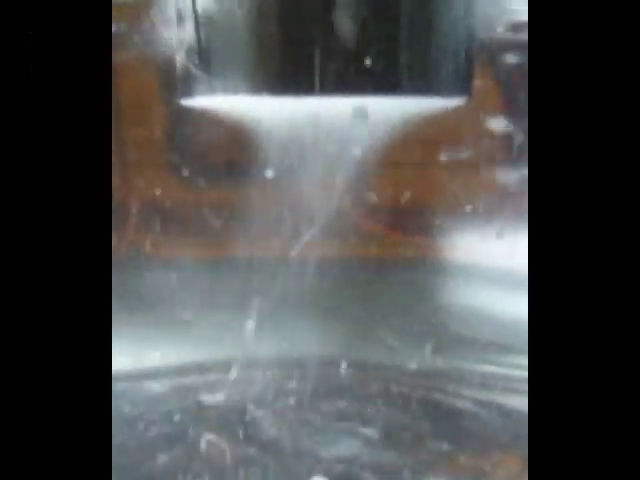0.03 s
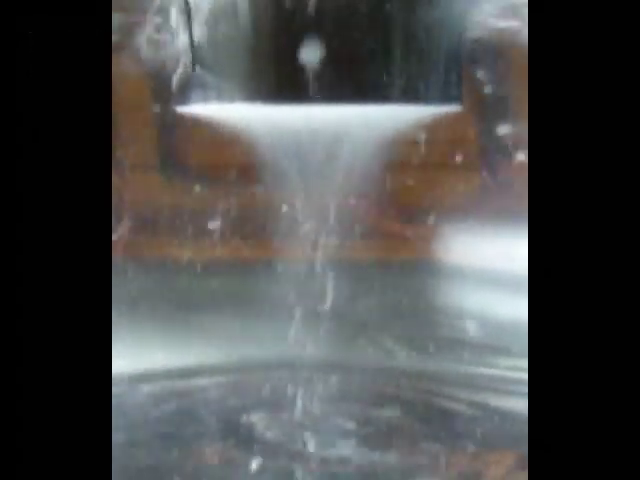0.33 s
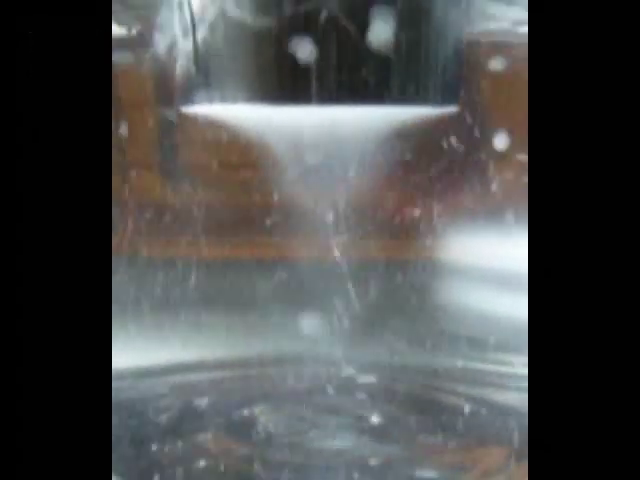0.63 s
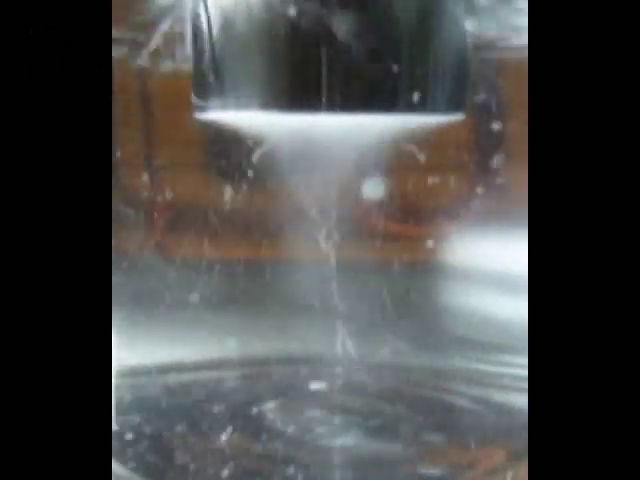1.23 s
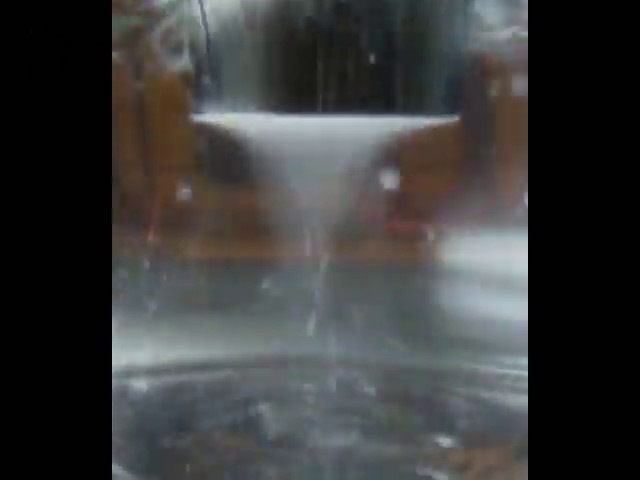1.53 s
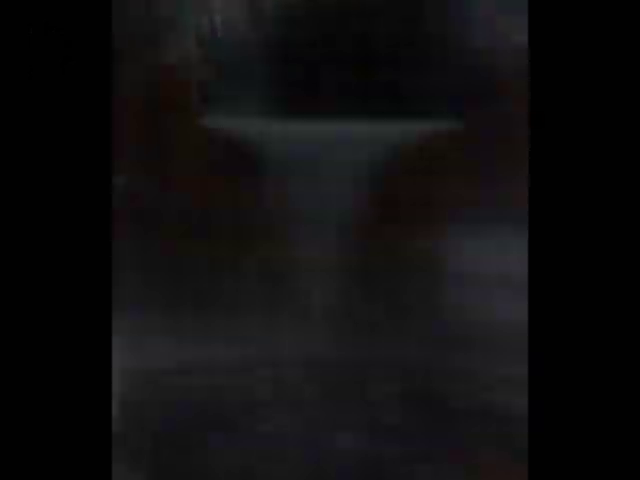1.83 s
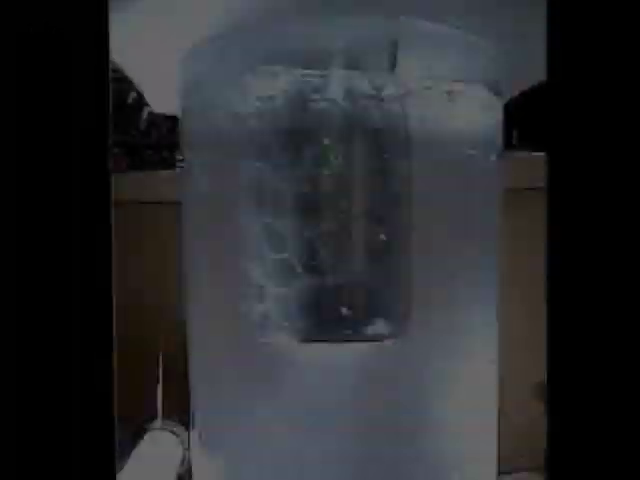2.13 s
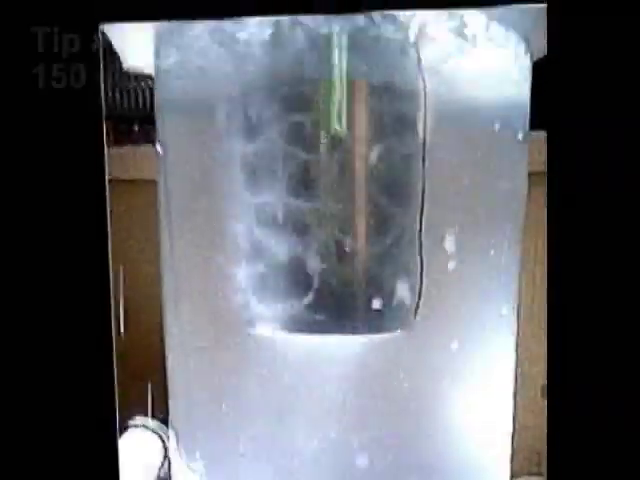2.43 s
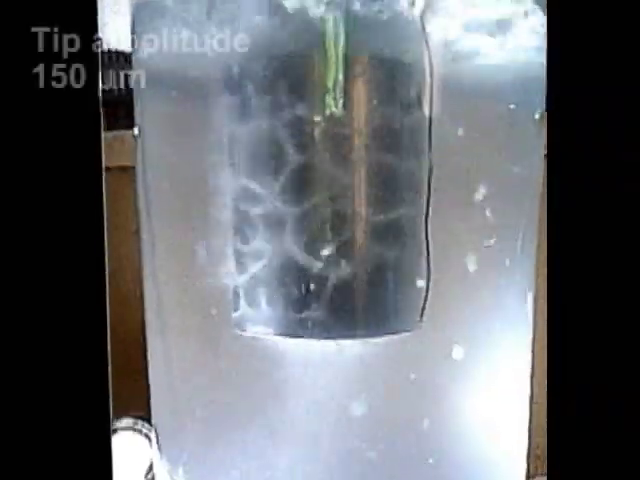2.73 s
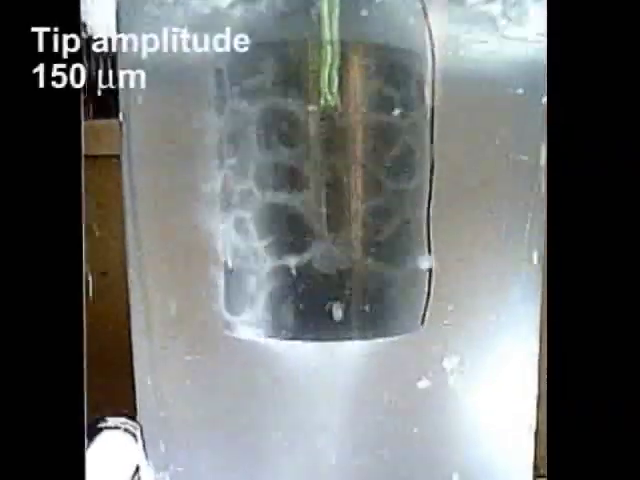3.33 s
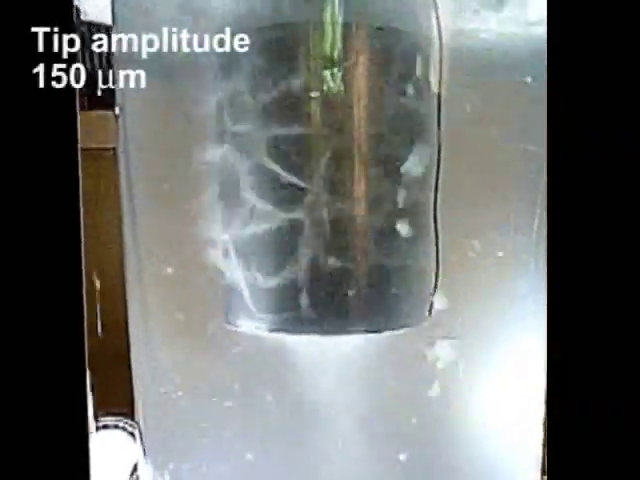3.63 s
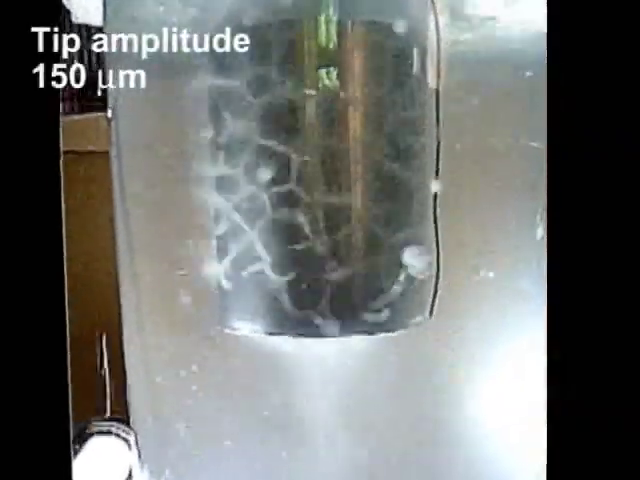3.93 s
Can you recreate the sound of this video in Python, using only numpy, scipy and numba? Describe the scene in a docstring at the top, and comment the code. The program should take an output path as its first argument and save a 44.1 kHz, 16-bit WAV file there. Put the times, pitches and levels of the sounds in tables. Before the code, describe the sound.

Harsh hiss and rough whistling from an ultrasonic probe churning bubbles in water.

```python
"""Ultrasonic tip cavitating in water

One microphone close by the vessel, no room sound, two set-ups joined by a hard cut with a faint tick.
Countless bubble collapses make a harsh hiss and drive wandering resonances of bubble cloud and vessel.
First a bubble cone under the tip sings in surges near 1.9 kHz; then the probe stands deep in the water
and the hiss is thinner and brighter."""
import sys
import numpy as np
from scipy import signal
from scipy.fft import rfft, irfft
from scipy.io import wavfile
from numba import njit

SR = 44100
rng = np.random.default_rng(int(sys.argv[2]) if len(sys.argv) > 2 else 0)


def generate_wav(signal):
    """Clip the signal to [-1, 1] and save it as 16-bit WAV at the path in sys.argv[1]."""
    frames = np.transpose(np.atleast_2d(signal))
    scaled = np.clip(frames, -1, 1) * 32767
    pcm = np.round(scaled).astype(np.int16)
    wavfile.write(sys.argv[1], SR, pcm)


N = 176400
TIME, FREQS = np.arange(N) / SR, np.arange(N // 2 + 1) * SR / N
CUT_S = 2.0385  # from the cone to the deep probe


def undb(db):
    return 10 ** (np.asarray(db) / 20)


def unit(x):
    """Scale to rms 1."""
    return x / np.sqrt(np.mean(x ** 2))


def curve(rows, column=1):
    """One column of a table, joined by straight lines in time."""
    rows = np.array(rows, float)
    return np.interp(TIME, rows[:, 0], rows[:, column])


def wobble(hz):
    """Gaussian wobble of spread 1 that holds nothing much faster than hz."""
    spectrum = rfft(rng.standard_normal(N)) * (FREQS > 0)
    return unit(irfft(spectrum / np.sqrt(1 + (FREQS / hz) ** 4), N))


def shaped(x, points):
    """Filter a sound by (frequency [Hz], gain [dB]) points."""
    hz, db = np.array(points, float).T
    gain_db = np.interp(np.log(np.maximum(FREQS, 1)), np.log(hz), db)
    return irfft(rfft(x) * undb(gain_db), N)


def low_end(x, below_hz):
    return signal.sosfiltfilt(signal.butter(2, below_hz, fs=SR, output="sos"), x)


@njit
def bandpass(x, hz, width_hz):
    """State-variable band-pass with a moving centre."""
    y, band_state, low_state = np.empty(len(x)), 0., 0.
    for i in range(len(x)):
        g, damping = np.tan(np.pi * hz[i] / SR), width_hz / hz[i]
        band = (band_state + g * (x[i] - low_state)) / (1 + g * (g + damping))
        band_state = 2 * band - band_state
        low_state += 2 * g * band
        y[i] = damping * band
    return y


def collapses(per_s=30000, spread_db=2.5):
    """A dense crackle of imploding bubbles of uneven size; rms 1."""
    happens = rng.random(N) < per_s / SR
    polarity = np.sign(rng.standard_normal(N))
    size = undb(spread_db * rng.exponential(size=N))
    return unit(happens * polarity * size)


def resonance(hz, width_hz):
    """A resonance with steep skirts, kept ringing by the collapses; rms 1."""
    centre = hz * np.ones(N)
    ring = bandpass(collapses(), centre, float(width_hz))
    return unit(bandpass(ring, centre, 3.5 * width_hz))


def whistle(hz, jitter_hz, rough, width_hz):
    """A self-sustained pulsation with a trembling pitch and a halo of ringing collapses; rms 1."""
    phase = 2 * np.pi * np.cumsum(hz + jitter_hz * wobble(120)) / SR
    return unit(unit(np.sin(phase)) + rough * resonance(hz, width_hz))


# The vessel's ring with the probe deep (time [s], level [dB])
HOLLOW_RING = [(2.04, -52), (2.6, -48), (3.36, -46.5), (3.41, -35.5), (3.45, -45), (3.52, -41.5),
               (3.6, -51)]

def hollow_ring():
    """Far back in the sound, the collapses ring the vessel with a faint hollow note."""
    return resonance(769, width_hz=18) * undb(curve(HOLLOW_RING))


def loose_bubbles(per_s=300, centre_hz=2363, spread_oct=.45, decay_s=.009):
    """Loose bubbles in the water, each a short damped ring at its own pitch."""
    t = TIME[:SR // 10]
    out = np.zeros(N + len(t))
    for when, pitch, size in rng.random((int(per_s * N / SR), 3)):
        hz = centre_hz * 2 ** (spread_oct * (2 * pitch - 1))
        start = int(when * N)
        out[start:start + len(t)] += size * np.exp(-t / decay_s) * np.sin(2 * np.pi * hz * t)
    return unit(out[:N]) * undb(-32.5)


# Whistling clusters (start [s], length [s], from [Hz], to [Hz], peak level [dB])
CLUSTER_CHIRPS = [(1.634, .06, 2380, 2070, -24), (2.18, .08, 2250, 2660, -26.5),
                  (2.736, 0.089, 2470, 2733, -27), (2.782, .26, 1123, 978, -42),
                  (3.072, 0.15, 1696, 1616, -33.5), (3.346, .14, 1457, 1440, -39.5),
                  (3.547, 0.13, 2070, 1943, -28)]

def cluster_chirps():
    """Bubble clusters whistle briefly, gliding as they grow or shrink."""
    out = np.zeros(N)
    for start, length, from_hz, to_hz, db in CLUSTER_CHIRPS:
        along = np.clip((TIME - start) / length, 0, 1)
        tone = whistle(from_hz + (to_hz - from_hz) * along, jitter_hz=18, rough=.5, width_hz=60)
        out += tone * np.sin(np.pi * along) * undb(db)
    return out


# Modes of cloud and vessel in each set-up
# (centre [Hz], width [Hz], level [dB], flutter [dB], drift [share of the pitch])
CONE_MODES = [(1616, 28, -39.5, 2, .002), (2561, 50, -31.5, 3.5, 0.0098), (3057, 72, -40, 4, .012),
              (3398, 40, -39.5, 2.5, .01)]
DEEP_MODES = [(1640, 50, -43.5, 2.5, 0.037), (2025, 70, -34.5, 5, .03), (2384, 70, -33.5, 2.7, 0.034),
              (2724, 63, -35.5, 4.1, 0.036), (3513, 90, -42, 3, 0.0089)]

def cloud(modes, drift_hz, flutter_hz):
    """Resonances that wander and flutter as the bubble cloud changes shape."""
    out = np.zeros(N)
    for hz, width_hz, db, flutter_db, drift in modes:
        ring = resonance(hz * (1 + drift * wobble(drift_hz)), width_hz)
        flutter = unit(undb(flutter_db * wobble(flutter_hz)))
        out += ring * flutter * undb(db)
    return out


# The cone's low ring and the sizzle atop its hiss (time [s], relative level [dB])
LOW_RING = [(0, -27), (.2, -34.5), (.34, -36), (.4, -53), (.65, -38), (.79, -30.5), (1.1, -38.5),
            (1.36, -31), (1.48, -39), (1.7, -48), (1.8, -34), (2.03, -36.5)]
SIZZLE = [(0, -36), (.35, -40), (.45, -36.5), (.62, -48), (1.15, -43), (1.29, -40.5), (1.5, -45),
          (1.6, -38), (1.69, -53), (1.8, -36.5), (1.98, -39.5), (2.03, -46.5)]
# The cone's rasp (time [s], relative level [dB], centre [Hz])
RASP = [(0, -30.5, 2875), (.39, -28, 2800), (.455, -22, 2850), (.51, -33, 2890), (.66, -27, 2770),
        (.9, -23, 2670), (1.05, -37.5, 2790), (1.28, -36.5, 2897), (1.4, -27.5, 2995), (1.57, -25.5, 2777),
        (1.7, -28, 2675), (1.85, -23.5, 2637), (2.03, -27, 2760)]

def cone_resonances():
    """Under the tip the collapses drive a low ring, a broad rasp and a thin sizzle."""
    ring = resonance(1315, width_hz=31) * undb(curve(LOW_RING) - .5)
    rasp_hz = curve(RASP, column=2) * (1 + .015 * wobble(5))
    rasp = resonance(rasp_hz, width_hz=280) * undb(curve(RASP) - 1)
    sizzle_hz = 3847 * (1 + .012 * wobble(2.7))
    sizzle = resonance(sizzle_hz, width_hz=73) * undb(curve(SIZZLE) - .5)
    return ring + rasp + sizzle


# Hiss spectrum round the deep probe (frequency [Hz], relative level [dB])
DEEP_HISS = [(20, -70), (100, -69), (260, -66), (500, -68.5), (1000, -65.5), (1450, -65), (1900, -61),
             (2450, -56), (2800, -59.5), (3030, -65.5), (3550, -62.5), (3830, -70), (4000, -78)]
# Churning of that hiss's low end (time [s], gain [dB])
CHURN = [(2.04, -2), (2.37, -2.5), (2.6, 1.5), (3.0, 0.5), (3.25, -1), (3.5, 1), (4, -0.5)]

def deep_hiss():
    """Collapses round the immersed probe: a thin, flickering hiss over churning water."""
    hiss = unit(shaped(collapses(), DEEP_HISS)) * undb(-25.5 + 1.1 * wobble(9))
    churn = low_end(hiss, below_hz=1400) * (undb(curve(CHURN)) - 1)
    return hiss + churn


# Hiss spectrum under the tip (frequency [Hz], relative level [dB])
CONE_HISS = [(20, -59), (45, -57), (150, -61), (270, -60.5), (500, -61.5), (1050, -62.5), (1500, -58),
             (2200, -59.5), (2900, -61.5), (3450, -63.5), (3680, -69), (4000, -72)]

def cone_hiss(surge):
    """Collapses in the cone: a harsh hiss whose low end heaves with the singing."""
    hiss = unit(shaped(collapses(), CONE_HISS)) * undb(-25)
    swell = unit(surge ** .47)  # 0.47 dB per dB of singing
    return hiss + low_end(hiss, below_hz=500) * (swell - 1)


# Two resonances round the deep probe (time [s], centre [Hz], relative level [dB])
LOWER_GLIDE = [(2.04, 1886, -38), (2.18, 1866, -28), (2.3, 1760, -40.5), (2.42, 1792, -27.5),
               (2.65, 1810, -39.5), (2.9, 1714, -29.5), (3.05, 1843, -34.5), (3.4, 1870, -40),
               (3.54, 1827, -26.5), (3.8, 1831, -36), (4, 1820, -32)]
UPPER_GLIDE = [(2.04, 3270, -29), (2.24, 3325, -33.5), (2.34, 3340, -26.5), (2.5, 3370, -30),
               (2.75, 3298, -27), (3.15, 3350, -32), (3.42, 3160, -35), (3.6, 3236, -26.5),
               (3.75, 3290, -27), (3.9, 3240, -25), (4, 3234, -34.5)]

def deep_glides():
    """Up front with the probe deep, two gliding resonances whistle roughly."""
    out = np.zeros(N)
    for glide, width_hz, trim_db in (LOWER_GLIDE, 67, .2), (UPPER_GLIDE, 130, -.86):
        tone = whistle(curve(glide), jitter_hz=33.9, rough=.9, width_hz=width_hz)
        out += tone * undb(curve(glide, column=2) + trim_db)
    return out


# Surges of the cone's singing (start [s], length [s], level [dB])
SURGES = [(0.014, 0.17, -25.5), (.32, 0.11, -27), (0.461, .17, -21.5), (0.683, .19, -21.5),
          (0.892, .13, -25), (1.06, .25, -20.5), (1.326, 0.052, -23.5), (1.407, .135, -23.5),
          (1.575, 0.059, -24.5), (1.677, 0.14, -21), (1.817, 0.25, -26)]

def surge_gain(attack_s=.025, release_s=.014, rest_db=-31.5):
    """Each surge of the singing swells, holds and dies back to a faint rest level."""
    gain = np.full(N, undb(rest_db))
    for start, length, db in SURGES:
        rise, fall = (TIME - start) / attack_s, (start + length - TIME) / release_s
        gain += (undb(db) - undb(rest_db)) * np.clip(np.minimum(rise, fall), 0, 1)
    return gain


def cone_singing(surge):
    """Up front, the bubble cone pulsates as a whole: a rough tone beating with a lower mode."""
    tone = whistle(1934 + 12 * wobble(14), jitter_hz=14, rough=.38, width_hz=70)
    lower_mode = resonance(1858, width_hz=45) * undb(-7)
    return surge * (tone + lower_mode)


def scene():
    """At the vessel: the cone, then the deep probe, with loose bubbles and chirps in both."""
    surge = surge_gain()
    cone = cloud(CONE_MODES, drift_hz=3.3, flutter_hz=6.1)
    cone += cone_resonances() + cone_hiss(surge) + cone_singing(surge)
    deep = cloud(DEEP_MODES, drift_hz=3.6, flutter_hz=7.6)
    deep += hollow_ring() + deep_hiss() + deep_glides()
    return (loose_bubbles() + cluster_chirps() + np.where(TIME < CUT_S, cone, deep))[None]


# Leak of the mirror image above half the recorder's sampling rate (frequency [Hz], gain [dB])
IMAGE_LEAK = [(4000, 2.5), (4300, -6.5), (4700, -15), (5000, -23.5), (5250, -32), (5480, -43.5)]

def record(dry, sampling_hz=8000, ceiling=.35, mic_top_hz=5486, top_hz=15800):
    """The microphone's narrow-band recorder rounds peaks and mirrors the treble; the cut ticks once."""
    rounded = ceiling * np.tanh(dry / ceiling)
    band = irfft(rfft(rounded) * (FREQS < sampling_hz / 2), N)
    image = shaped(band * 2 * np.cos(2 * np.pi * sampling_hz * TIME), IMAGE_LEAK)
    heard = signal.sosfilt(signal.ellip(10, .2, 80, mic_top_hz, fs=SR, output="sos"), band + image)
    tick = undb(-10.5) * (TIME >= CUT_S) * np.exp(-np.abs(TIME - CUT_S) / .00018)
    return signal.sosfilt(signal.ellip(8, .2, 70, top_hz, fs=SR, output="sos"), heard + tick)


dry = scene()
out = record(dry)
generate_wav(out)
```